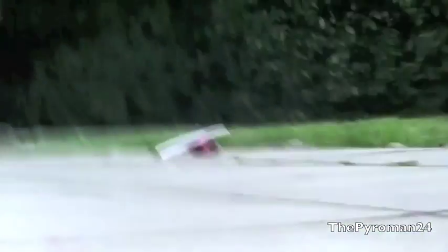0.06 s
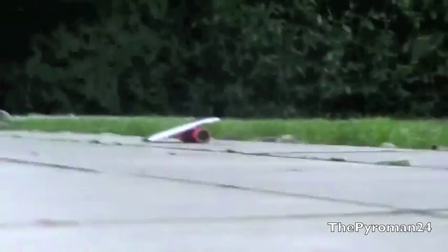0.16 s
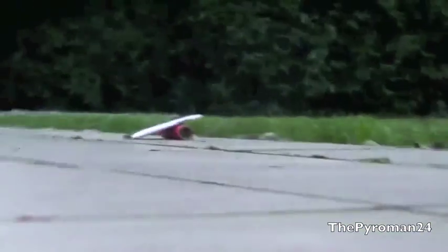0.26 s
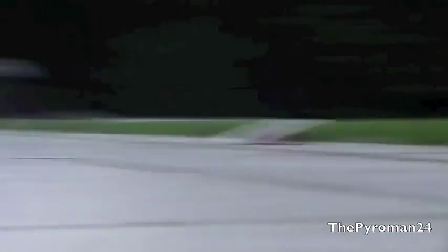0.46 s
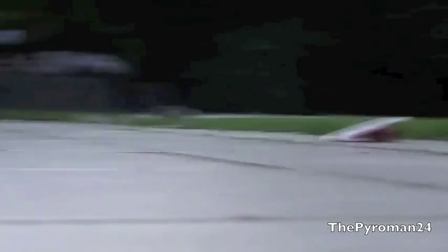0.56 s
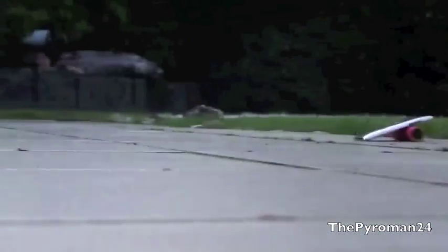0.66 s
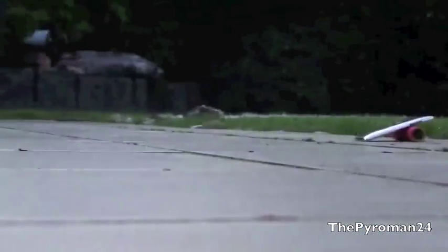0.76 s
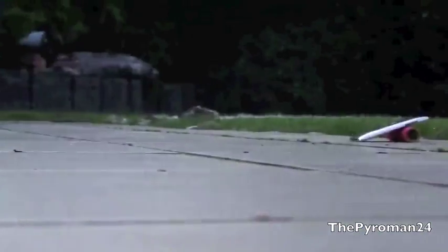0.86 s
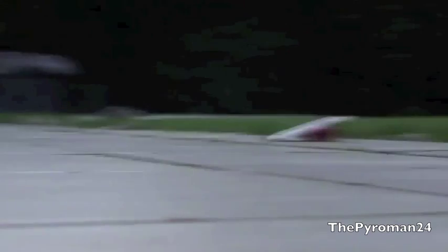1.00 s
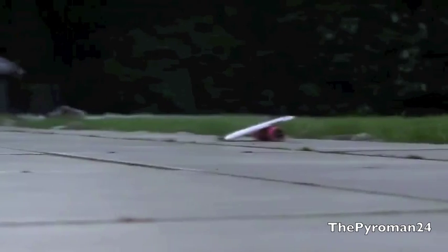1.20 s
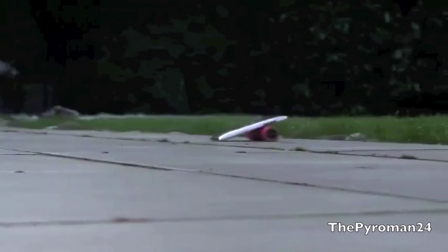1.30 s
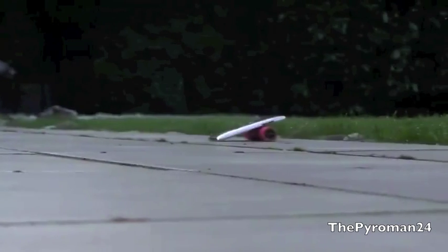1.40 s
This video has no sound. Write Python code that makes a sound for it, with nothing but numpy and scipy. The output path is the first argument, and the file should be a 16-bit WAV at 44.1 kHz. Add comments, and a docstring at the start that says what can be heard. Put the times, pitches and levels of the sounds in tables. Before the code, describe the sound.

Close handling noise from a camera swung about outdoors: a low thump, short bright scrapes and more thumps, then two dry plastic clacks. The grip scrapes again and a last clack lands, over faint rumble.

```python
"""A hand-held camera is swung about just above a pavement, so its own casing makes most of the sound.
Faint handling rumble and quiet outdoor air lie under it all. After a small tick, the grip bumps the body
into a low thump at 0.24 s, then rubs and snags in short bright scrapes up to more thumps near 0.55 s.
Dry plastic clacks follow: a bright one on the left at 0.71 s, a duller, centred one at 0.8 s.
The grip scrapes again from about 0.95 to 1.2 s, and one last clack lands with a soft bump at 1.4 s."""
import sys
import numpy as np
from scipy import signal
from scipy.fft import rfft, irfft
from scipy.io import wavfile

SR = 44100
rng = np.random.default_rng(int(sys.argv[2]) if len(sys.argv) > 2 else 0)


def wrap_up_sound(samples):
    """Save the sound to the file named by the first command line argument, as 16-bit audio."""
    columns = np.atleast_2d(samples).T
    # keep every value between -1 and 1, then stretch to whole-number steps
    tamed = np.clip(columns, -1, 1)
    steps = np.round(tamed * 32767).astype(np.int16)
    wavfile.write(sys.argv[1], SR, steps)


N = 63945


def amp(db):
    """Decibels to gain."""
    return 10 ** (np.asarray(db) / 20)


def unit(x):
    """Scale to rms 1."""
    return x / np.sqrt(np.mean(x ** 2))


def add(out, start, sound, pan_db):
    """Mix a stereo sound in at start seconds; pan_db is left level minus right."""
    i = int(start * SR)
    out[:, i:i + sound.shape[1]] += (sound * amp([[pan_db / 2], [-pan_db / 2]]))[:, :N - i]


def colour(x, points):
    """Minimum-phase EQ through (Hz, dB) points, scaled to unit power."""
    size = 4096
    hz, db = np.array(points, float).T
    bin_hz = np.arange(size // 2 + 1) * SR / size
    gain = unit(amp(np.interp(np.log(bin_hz + 1), np.log(hz), db)))
    cepstrum = irfft(np.log(gain))
    cepstrum[1:size // 2] *= 2
    cepstrum[size // 2 + 1:] = 0
    impulse = irfft(np.exp(rfft(cepstrum)))
    return signal.fftconvolve(x, impulse[None], axes=1)[:, :x.shape[1]]


def rolloff(hz, corner_hz):
    """Low-pass gain, falling 12 dB an octave above the corner."""
    return 1 / np.sqrt(1 + (hz / corner_hz) ** 4)


def wander(rate_hz):
    """Smooth random drift with a spread near 1."""
    return np.interp(np.arange(N) * rate_hz / SR, np.arange(N), rng.standard_normal(N))


def port_noise(likeness, size=N):
    """White noise at the two microphone ports: likeness 0 is wide, 1 is mono."""
    mid, side = rng.standard_normal((2, size))
    return np.sqrt((1 + likeness) / 2) * mid + np.sqrt((1 - likeness) / 2) * np.array([side, -side])


def port_times(lag_s, size):
    """Seconds since a blow at each port; it reaches the right one lag_s later."""
    return np.maximum(np.arange(size) / SR - np.array([[0], [lag_s]]), 0)


# Fader ride of the handling rumble (time [s], level [dB])
RUMBLE_RIDE = [(0, -51), (0.16, -50.5), (0.22, -53), (0.29, -49.5), (0.42, -55), (0.51, -45.5),
               (0.64, -52.5), (0.72, -52.5), (0.85, -56.5), (0.97, -48.5), (1.1, -54), (1.2, -52.5),
               (1.33, -56), (1.45, -48.5)]
# Bass-heavy EQ of the rumble (frequency [Hz], relative gain [dB])
RUMBLE_EQ = [(20, -24), (50, -7), (100, -5), (155, -2), (230, -10), (300, -11), (500, -20.5), (1000, -27),
             (3000, -67)]
# Soft, low-mid EQ of the air (frequency [Hz], relative gain [dB])
AIR_EQ = [(100, 0.5), (500, 9.5), (1100, -3), (2000, -9), (3200, -15), (8000, -20), (16000, -16.5)]

def background():
    """The bed: mono rumble from the holding hand and steady, quiet outdoor air."""
    rumble_db = np.interp(np.arange(N) / SR, *np.array(RUMBLE_RIDE).T)
    rumble = colour(port_noise(likeness=1), RUMBLE_EQ) * amp(rumble_db)
    air = colour(port_noise(likeness=0.72), AIR_EQ) * amp(-61.5)
    return rumble + air


# Fader rides of the sliding grip (time [s], hiss level [dB], rasp level [dB])
RUB_RIDE = [(0, -66.5, -61.5), (0.06, -62.5, -60), (0.09, -49.5, -49), (0.125, -63.5, -60),
            (0.154, -55, -59), (0.19, -63.5, -65), (0.305, -68.5, -60), (0.325, -52, -52), (0.35, -57, -58),
            (0.387, -72, -77), (0.404, -33, -59), (0.412, -40, -35.5), (0.424, -50, -53), (0.458, -42, -46),
            (0.477, -47.5, -48.5), (0.501, -39, -38.5), (0.518, -42, -44), (0.538, -43, -37.5),
            (0.555, -47.5, -44.5), (0.573, -47.5, -42.5), (0.609, -52, -59), (0.66, -61.5, -63),
            (0.74, -66.5, -63.5), (0.773, -63, -50.5), (0.798, -72, -63), (0.887, -64, -60.5),
            (0.905, -65, -52.5), (0.928, -67, -62.5), (0.956, -52.5, -45.5), (0.98, -51.5, -48.5),
            (0.999, -49, -39.5), (1.014, -49.5, -46.5), (1.058, -56.5, -50), (1.075, -75, -61.5),
            (1.119, -66, -63), (1.138, -60, -47), (1.16, -48, -49), (1.182, -50, -39.5),
            (1.197, -63, -59.5), (1.23, -73.5, -65), (1.45, -69, -65.5)]
# Bright EQ of the hiss (frequency [Hz], relative gain [dB])
HISS_EQ = [(500, -20), (1800, 2), (2600, 8), (3600, 7.5), (4800, 4.5), (7000, -1.5), (10000, -0.5),
           (12500, -0.5), (16000, -8)]
# Boxy EQ of the casing's rasp (frequency [Hz], relative gain [dB])
RASP_EQ = [(60, -12), (160, 1), (260, -13.5), (500, -0.5), (720, 0), (930, 5), (1200, 2), (1600, -3.5),
           (2100, -2.5), (3500, -23.5), (9000, -46)]

def rubbing():
    """The grip slides in dense, uneven slips that hiss at the ports and rasp in the casing."""
    slips_per_s, slip_spread_db = 6000, 3
    judder_db, judder_hz = 1.5, 164.2
    times, hiss_db, rasp_db = np.array(RUB_RIDE).T
    t = np.arange(N) / SR
    slipping = rng.random(N) < slips_per_s / SR
    strength = amp(slip_spread_db * np.minimum(rng.exponential(size=N), 2))
    slips = unit(slipping * strength * amp(judder_db * wander(judder_hz)))
    hiss = slips * port_noise(likeness=0.12) * amp(np.interp(t, times, hiss_db))
    rasp = slips * port_noise(likeness=0.2) * amp(np.interp(t, times, rasp_db))
    return colour(hiss, HISS_EQ) + colour(rasp, RASP_EQ)


# Cues for the grip's short scrapes (time [s], level [dB], decay [s], pan L-R [dB])
SNAG_CUES = [(0.09, -60, .001, -7), (0.2342, -34.5, 0.00041, 1), (0.242, -29, 0.0015, 2),
             (0.3072, -46.5, 0.0031, 5), (0.3181, -24.5, 0.0014, -1), (0.322, -24, 0.0012, -1.5),
             (0.3265, -36, 0.0016, 15.5), (0.3942, -33, 0.0011, -13), (0.3998, -32, 0.00051, 19),
             (0.4029, -45, 0.0025, 12), (0.4108, -27, 0.00053, -13), (0.431, -50, 0.00085, 2),
             (0.4522, -41.5, 0.00067, -9), (0.4868, -39, 0.0014, 7), (0.4947, -27, .0013, -10),
             (0.5040, -26, 0.0015, 2), (0.5268, -35, 0.0034, 0), (0.5347, -31, 0.0022, -2),
             (0.539, -39, 0.003, -2), (0.5693, -53, 0.0021, -7), (0.594, -43, 0.00069, -3),
             (0.7594, -38.5, 0.00093, 0.5), (0.9129, -41, 0.0011, 3), (0.9735, -32.5, 0.00093, 3),
             (0.978, -41, 0.00047, 11), (0.991, -35, 0.00053, 2), (0.999, -44, 0.00083, -10),
             (1.0572, -36.5, 0.00082, -5.5), (1.1262, -39, .001, -1), (1.1342, -31.5, 0.0032, 0),
             (1.1461, -31, 0.0026, -6), (1.1551, -43.5, .001, -5), (1.1692, -37.5, 0.0023, 0),
             (1.1715, -30, 0.0035, 4.5), (1.1803, -27, 0.00074, -1), (1.2036, -40.5, 0.00066, -2),
             (1.3570, -55, 0.001, -1)]
# Crisp EQ of the scrapes (frequency [Hz], relative gain [dB])
SNAG_EQ = [(100, -15.5), (600, -8.5), (1000, -3), (1550, 3.5), (2200, -8.5), (3600, -1), (5000, 0),
           (8000, 0.5), (10000, -1.5), (12500, 2), (16000, -1)]

def snags():
    """The grip creaks as it strains, then lets go in a bright burst of a few milliseconds."""
    rise_s, strain_db, strain_s = 0.00054, -13.5, 0.0017
    out = np.zeros((2, N))
    t = np.arange(-SR // 50, SR // 20) / SR  # zero is the moment of release
    strain = amp(strain_db) * np.exp(-np.abs(t) / strain_s)
    since_hold = np.maximum(t - 2 * rise_s, 0)
    for start, db, decay_s, pan_db in SNAG_CUES:
        burst = np.clip(t / rise_s, 0, 1) * np.exp(-since_hold / decay_s)
        scrape = np.maximum(burst, strain) * port_noise(likeness=0.29, size=len(t))
        add(out, start + t[0], amp(db) * scrape, pan_db)
    return colour(out, SNAG_EQ)


# Narrow rings of the casing under the grip (frequency [Hz], Q, send level [dB])
CASING_RINGS = [(1594, 11.7, -4.5), (3720, 11.7, -4.5), (5450, 37, -5), (6820, 43, 1), (8450, 28, 0.5),
                (12200, 110, 2), (11800, 61, -7)]

def casing(friction):
    """The thin casing rings briefly at a few pitches and smears each slip with many weaker resonances."""
    smear_db, smear_s = -10, 0.0044
    ringing = friction + sum(amp(db) * signal.lfilter(*signal.iirpeak(hz, q, fs=SR), friction)
                             for hz, q, db in CASING_RINGS)
    t = np.arange(SR // 20) / SR
    smear = rng.standard_normal(len(t)) * np.exp(-t / smear_s)
    smear /= np.linalg.norm(smear)
    return ringing + amp(smear_db) * signal.fftconvolve(ringing, smear[None], axes=1)[:, :N]


# Cues for the low thumps (time [s], pre-filter level [dB], brightness [Hz], ring t60 [s], pan L-R [dB])
BUMP_CUES = [(0.033, -40, 90, 0.089, -4), (0.2351, -13.5, 347, .05, -1.5), (0.2431, -15.5, 895, 0.015, -10),
             (0.354, -28, 114, 0.032, 3), (0.542, -18.5, 203, 0.023, 4.5), (0.5687, -16.5, 267, .15, 1),
             (0.77, -40, 200, 0.056, -4), (0.8970, -32, 170, 0.065, 0), (0.976, -33, 177, 0.05, 6),
             (1.179, -34, 252, 0.053, -1), (1.41, -29, 204, 0.024, 0)]
# Low modes of the camera body (frequency [Hz], relative level [dB], share of the ring t60)
BUMP_MODES = [(68, -11, 0.4), (120, -19, .55), (170.6, -0.5, 1), (314, -5.5, 0.49), (411, -8, 0.72),
              (472, -12, 0.78), (602, -11.5, 1), (927, -5, 1)]

def bumps():
    """Soft blows ring the body's low modes; a firm grip damps them sooner."""
    out = np.zeros((2, N))
    t = port_times(lag_s=0.00024, size=SR // 4)
    detune = 1 + 0.036 * np.array([[.5], [-.5]])  # the two sides of the body ring slightly apart
    for start, db, bright_hz, t60, pan_db in BUMP_CUES:
        ring = np.zeros_like(t)
        for hz, mode_db, share in BUMP_MODES:
            envelope = amp(mode_db - 60 * t / (t60 * share))
            ring += envelope * rolloff(hz, bright_hz) * np.sin(2 * np.pi * hz * detune * t)
        attack = np.minimum(t * bright_hz * 2, 1)  # duller blows rise more slowly
        add(out, start, amp(db) * ring * attack, pan_db)
    return out


# Cues for the dry clacks (time [s], pre-filter level [dB], low cut [Hz], brightness [Hz], pan L-R [dB])
CLACK_CUES = [(0.0317, -25, 590, 1230, -7), (0.2353, -21.5, 396, 1210, 13.5),
              (0.5685, -19.5, 400, 1500, -9), (0.7134, -15.5, 292, 6100, 12), (0.7314, -26, 500, 2110, 13),
              (0.7397, -37, 700, 3200, 15), (0.8038, -10.5, 1250, 2140, 0), (1.4110, -21, 500, 1480, -3)]
# Short modes of the struck plastic (frequency [Hz], relative level [dB], t60 [s])
PLASTIC_MODES = [(352, -18, 0.026), (596, -18, 0.022), (987, -11, 0.02), (1397, -13, 0.021),
                 (1616, -16.5, 0.014), (2133, -16, 0.015), (3040, 3, 0.006), (3450, -12, 0.016),
                 (3760, -16, 0.016), (5100, -22, 0.01), (8650, -4, 0.0077)]

def clacks():
    """Hard plastic contacts: a crack, quickly damped modes and a faint noise tail."""
    rise_s, phase_spread_rad = 0.00066, 0.62
    crack_db, crack_s, tail_db, tail_s = -18, 0.0024, -35, 0.0036
    out = np.zeros((2, N))
    t = port_times(lag_s=0.00007, size=SR // 10)
    attack = np.minimum(t / rise_s, 1)
    crack_envelope = amp(crack_db) * np.exp(-t / crack_s) + amp(tail_db) * np.exp(-t / tail_s)
    for start, db, low_hz, bright_hz, pan_db in CLACK_CUES:
        phases = phase_spread_rad * rng.standard_normal((len(PLASTIC_MODES), 2, 1))
        ring = np.zeros_like(t)
        for k, (hz, mode_db, t60) in enumerate(PLASTIC_MODES):
            high_cut = rolloff(hz, bright_hz) ** 2  # a softer contact feeds the high modes less
            low_cut = rolloff(low_hz, hz)
            envelope = amp(mode_db - 60 * t / t60) * high_cut * low_cut
            ring += (-1) ** k * envelope * np.sin(2 * np.pi * hz * t + phases[k])
        crack = port_noise(likeness=0.34, size=SR // 10) * crack_envelope
        crack = signal.lfilter(*signal.butter(1, bright_hz, fs=SR), crack)
        add(out, start, amp(db) * (ring + crack) * attack, pan_db)
    return out


def scene():
    """The mix at the two ports: friction through the casing, clacks and thumps over the bed."""
    return casing(rubbing() + snags()) + clacks() + bumps() + background()


def record(dry):
    """The deepest bass is thinned, the high treble narrows towards mono and the top is cut."""
    low_cut_hz, narrow_above_hz, top_hz = 31, 9200, 16100
    left, right = signal.sosfilt(signal.butter(2, low_cut_hz, "high", fs=SR, output="sos"), dry)
    mid, side = (left + right) / 2, (left - right) / 2
    width = rolloff(np.arange(N + 1) * SR / (2 * N), narrow_above_hz)
    side = irfft(rfft(side, 2 * N) * width)[:N]
    top_cut = signal.ellip(10, .2, 80, top_hz, fs=SR, output="sos")
    return signal.sosfilt(top_cut, np.array([mid + side, mid - side]))


dry = scene()
out = record(dry)
wrap_up_sound(out)
```